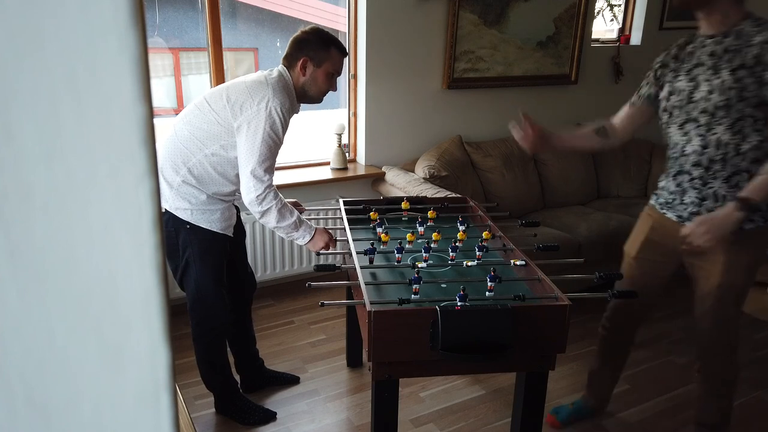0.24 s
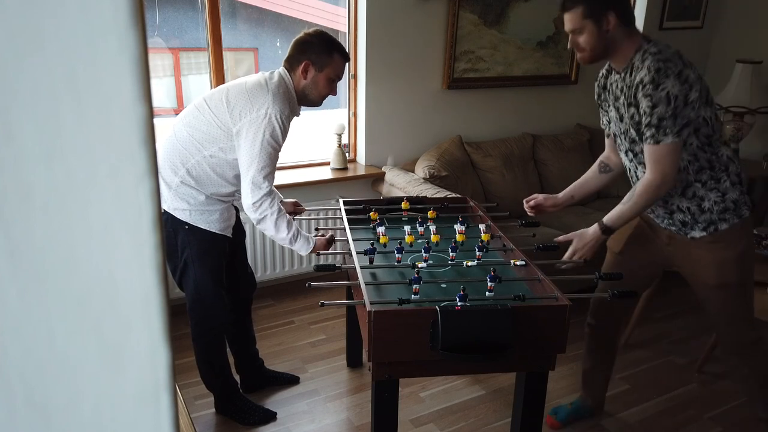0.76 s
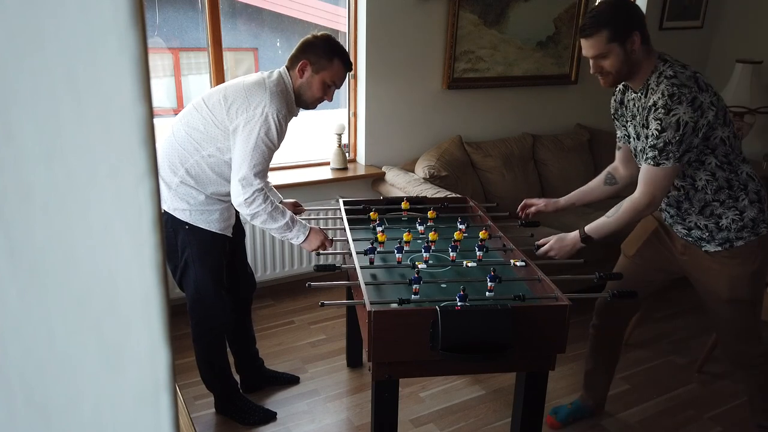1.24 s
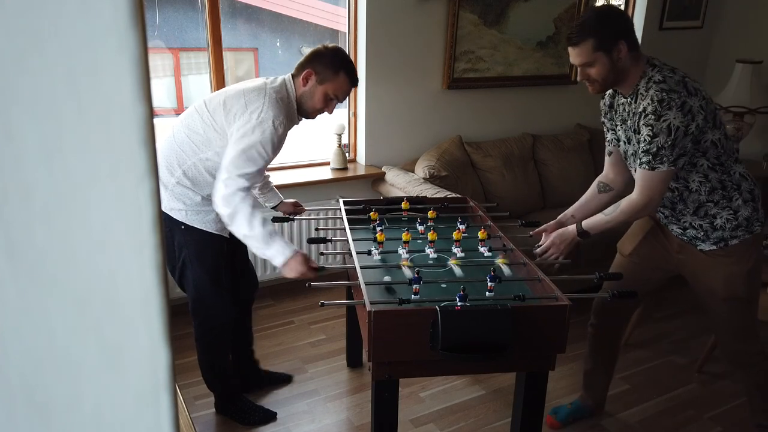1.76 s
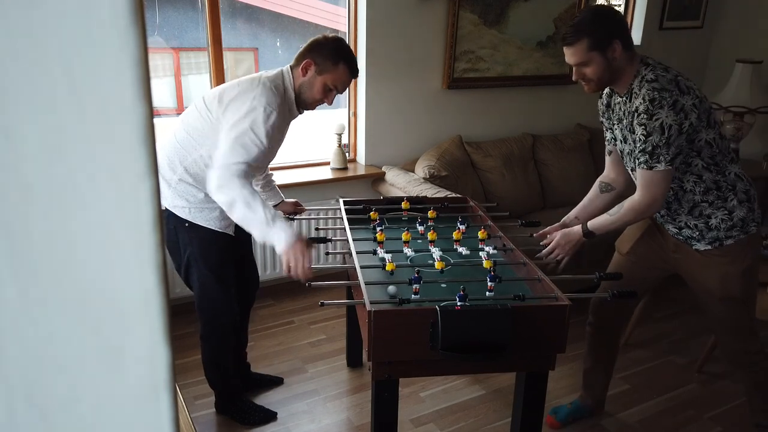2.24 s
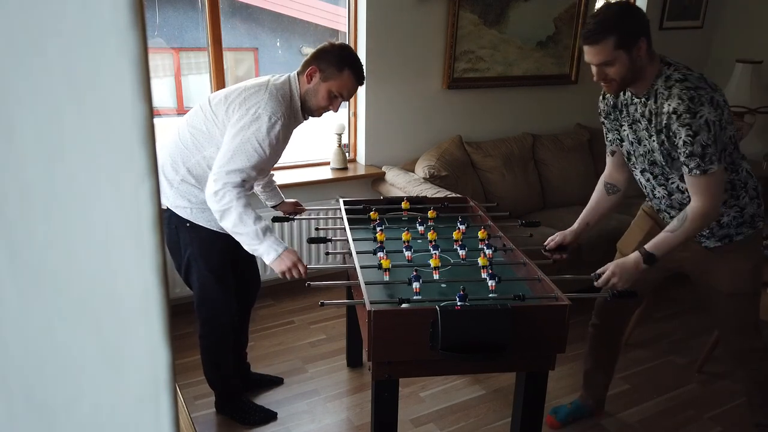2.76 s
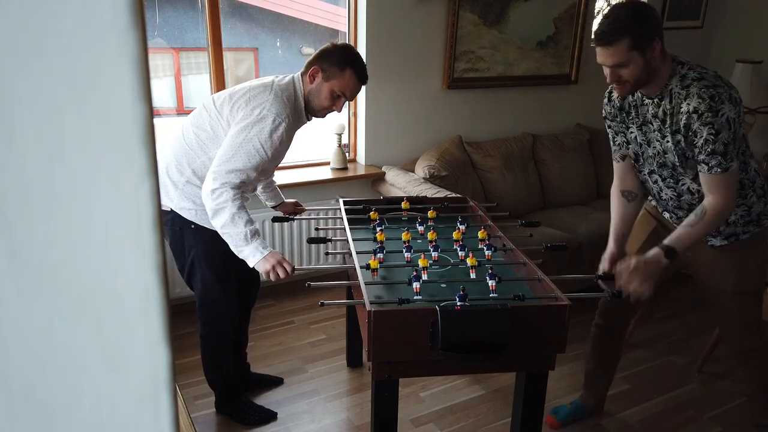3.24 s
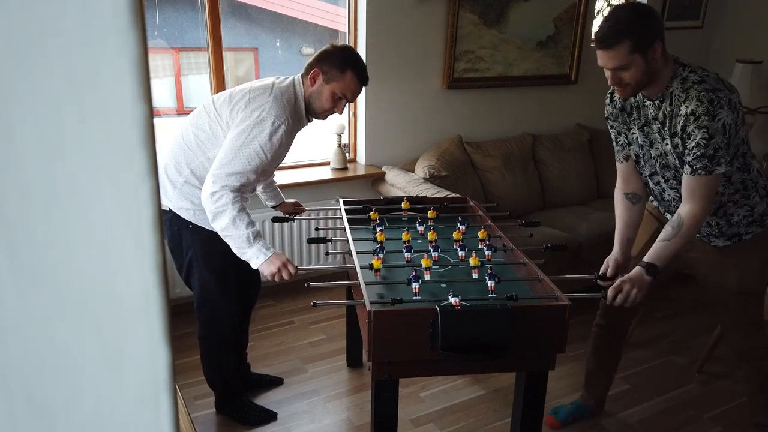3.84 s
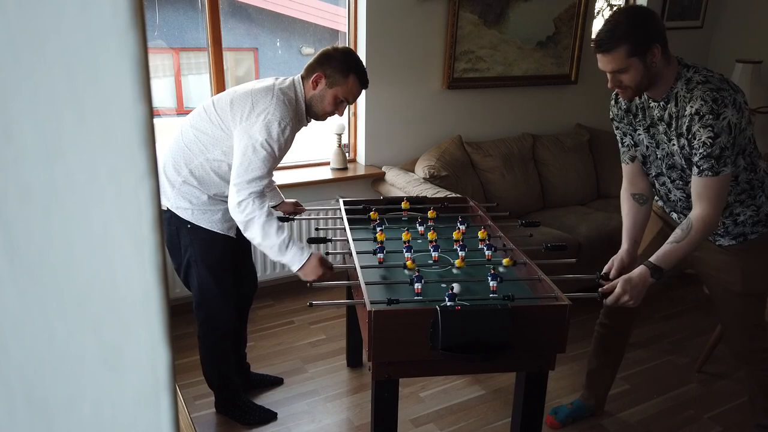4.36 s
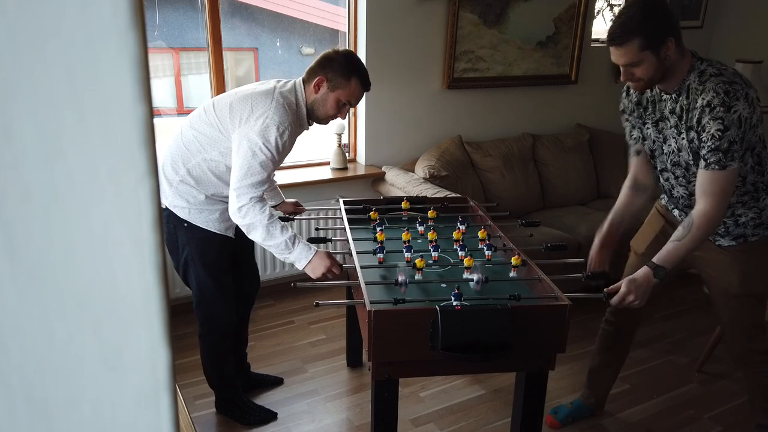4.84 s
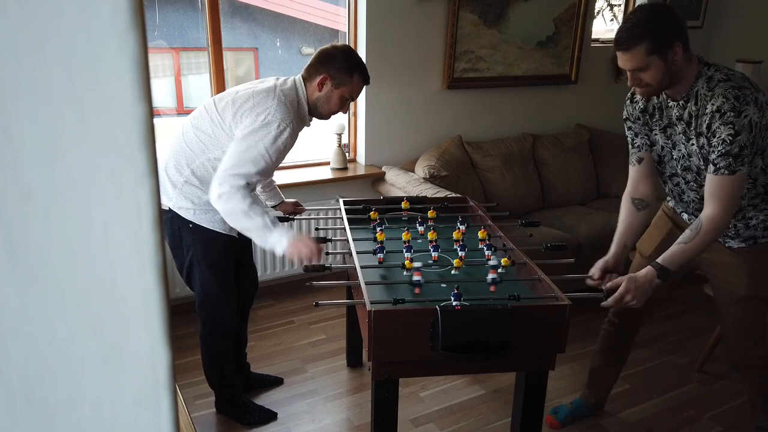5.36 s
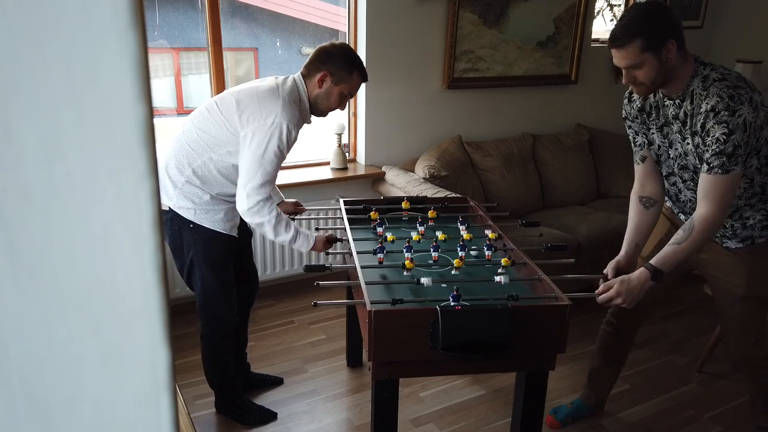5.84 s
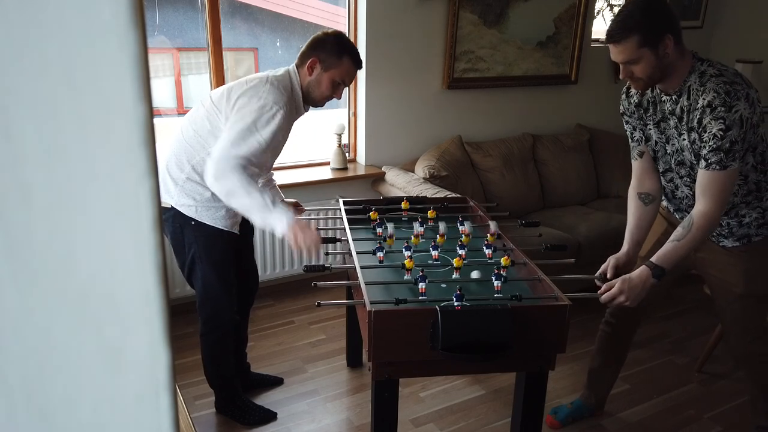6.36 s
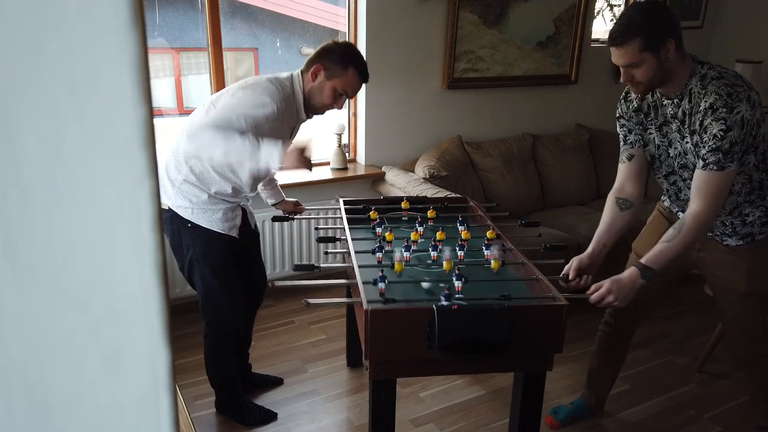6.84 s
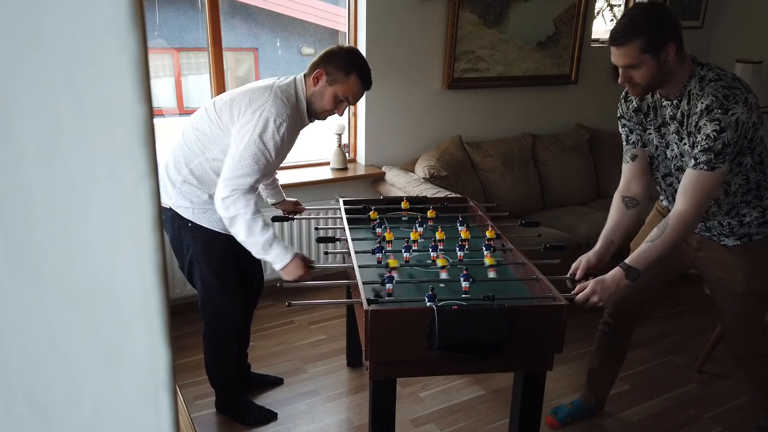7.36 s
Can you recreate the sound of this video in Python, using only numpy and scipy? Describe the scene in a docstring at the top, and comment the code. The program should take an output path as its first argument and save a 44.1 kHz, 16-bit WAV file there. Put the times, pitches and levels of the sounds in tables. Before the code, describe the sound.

Sharp ball and figure knocks on a hollow foosball table, loose steel rods rattling and ringing, with soft room echo and a final heavy flurry.

```python
"""Sharp knocks and clacks of table football in a living room, over hollow booms, rattle and low rumble.
Ball and figures are struck modes plus contact noise; the wooden cabinet booms on its panel modes.
Steel rods ring when they kick; loose in their bearings, they rattle as random clicks and hiss.
Floor boards rumble as decaying low noise; the room adds echoes and a short diffuse tail.
Two close microphone ports, a few metres away, hear it all over steady room tone."""
import sys
import numpy as np
from scipy import signal
from scipy.fft import rfft, irfft
from scipy.io import wavfile

SR = 44100
rng = np.random.default_rng(int(sys.argv[2]) if len(sys.argv) > 2 else 0)


def pcm_store(signal):
    """Save signal as 16-bit PCM."""
    levels = np.round(np.clip(np.atleast_2d(signal), -1, 1) * 32767)
    wavfile.write(sys.argv[1], SR, levels.astype(np.int16).T)


N = 335160  # samples
RING = np.arange(SR // 4) / SR  # time axis of one ring, s
STEP = 32  # samples between points of a coarse power curve

# Blows on the table, levels before the room. Each row: start in seconds, knock level in dB, clack level
# in dB, cabinet level in dB, struck panel pitch in Hz, tick level in dB, rod chink level in dB.
BLOW_EVENTS = [(0.376, -69.5, -67, -60, 170, -68, -78), (0.654, -68.5, -65, -54, 161, -62, -62),
               (0.949, -24.5, -13.5, -15, 463, -19.5, -26), (0.996, -18, -26, -13.5, 430, -39, -25.5),
               (1.038, -24, -25.5, -20, 406, -35, -30.5), (1.189, -42, -50, -30, 447, -67, -70),
               (1.246, -17, -11, -26, 427, -27, -30), (1.321, -36.5, -28.5, -23.5, 428, -34, -45),
               (1.572, -45.5, -43.5, -32.5, 260, -78, -80), (1.748, -56, -70, -39, 420, -83, -89),
               (1.814, -43, -68, -31, 456, -69, -80), (1.934, -60, -71, -37.5, 360, -72, -74),
               (2.048, -20, -23, -15, 418, -25.5, -25.5), (2.355, -78, -75, -46, 133.4, -75, -86),
               (2.4, -60, -72, -44.5, 484, -89, -65.5), (2.433, -47, -44, -32, 467, -64, -72.5),
               (2.483, -46, -48, -32.5, 453, -60.5, -71), (2.64, -77.5, -74, -45.5, 403, -84.5, -84),
               (2.757, -75.5, -73.5, -46.5, 454, -89.5, -85.5), (2.796, -62, -72, -41.5, 571, -82, -84),
               (2.833, -41, -49.5, -39.5, 241, -80, -81), (2.889, -55, -70, -55, 251, -81.5, -86),
               (2.931, -59, -68, -41.5, 432, -75, -82.5), (2.98, -67.5, -73.5, -54.5, 203, -81, -82),
               (3.497, -70.5, -66, -47, 140, -83.5, -88), (3.513, -59, -71.5, -43.5, 597, -87.5, -85.5),
               (3.543, -69.5, -69.5, -41, 232, -86.5, -86), (3.619, -67.5, -83.5, -67, 638, -85, -76),
               (4.088, -30, -30, -19, 456, -40, -45), (4.104, -41, -46, -35, 230.7, -58, -48),
               (4.219, -48.5, -32.5, -28.5, 444.5, -30.5, -30.5), (4.258, -49, -56, -52, 517, -47, -64),
               (4.392, -53.5, -74.5, -40.5, 153, -62, -78), (4.538, -61, -73.5, -38.5, 205, -69, -77),
               (4.666, -46.5, -66, -33, 205, -78, -79), (4.709, -42, -63, -44, 576.5, -59.5, -68),
               (4.728, -61, -64, -52, 210, -57.5, -66), (4.888, -40.5, -34, -27.5, 202, -44.5, -52),
               (4.959, -24.5, -45, -29.5, 455, -25.5, -34), (4.99, -29.5, -32, -28, 215, -25, -30),
               (5.1, -37.5, -60, -29, 130, -45, -52), (5.239, -16.5, -20, -25.5, 684, -40, -48.5),
               (5.516, -56, -72, -48.5, 206.5, -67.5, -74), (5.647, -64.5, -81, -47, 226, -84, -87.5),
               (5.668, -73.5, -78, -63.5, 560, -86.5, -86), (5.722, -49.5, -76, -40, 439, -80.5, -78),
               (5.798, -53.5, -74, -37, 477, -67.5, -76), (5.906, -43.5, -28, -26.5, 193, -37, -52),
               (6.025, -43, -63, -37, 231, -53, -61), (6.079, -28, -23.5, -32.5, 226, -29, -33),
               (6.16, -16, -10, -35, 405, -29, -38), (6.18, -14.5, -44, -16, 134, -31.5, -59),
               (6.2, -27.5, -23.5, -33, 442, -46, -55.5), (6.35, -30, -37, -24.5, 240, -47, -52.5),
               (6.495, -41, -64, -27.5, 239, -85, -84), (6.611, -43.5, -38, -32.5, 173, -46, -58),
               (6.774, -65, -71, -42, 422, -65, -77), (6.845, -38, -37.5, -27.5, 579, -49, -56),
               (6.903, -45, -50, -27.5, 452, -45, -39), (6.925, -30.5, -29.5, -32, 614, -36.5, -44),
               (6.969, -20.5, -18.5, -15, 436, -32.5, -33.5), (7, -22, -30, -18, 202, -31, -28.5),
               (7.063, -22.5, -24, -16.5, 400, -36, -26.5), (7.269, -42.5, -55, -30.5, 560, -59, -65),
               (7.514, -58, -71, -40.5, 208, -71, -77.5)]
# Modes of playing field and figures. Each row: frequency in Hz, relative level in dB, t60 in seconds.
FIELD_MODES = [(697, 1.5, 0.054), (914, 2, 0.048), (1072, -5.5, 0.071), (1196, 2, 0.051),
               (1200, -7.5, 0.0086), (1421, -0.5, 0.13), (1384, -1, 0.033), (1503, -7.5, 0.01),
               (1740, -1, 0.046), (1960, -1.5, 0.037), (2130, -2, 0.033), (2350, -4.5, 0.033),
               (2443, 1.5, 0.027), (2767, -3.5, 0.016), (3210, -9.5, 0.04), (3660, -20, 0.033)]
# Modes of the hollow wooden cabinet. Each row: frequency in Hz, relative level in dB, t60 in seconds.
CABINET_MODES = [(131, -3.5, 0.16), (164.4, -5, 0.11), (208.3, -2, 0.11), (242.8, -4, 0.089),
                 (282.5, -10.5, 0.077), (367, -3, 0.079), (418.6, 1, 0.068), (450, 1, 0.12),
                 (481, -6.5, 0.048), (569.3, -1.5, 0.068), (594.5, -4, 0.13), (673, -8, 0.058),
                 (841, -9, 0.067), (990, -14.5, 0.063), (1143, -13.5, 0.059), (1324, -25, .08),
                 (1443, -17.5, 0.02), (1700, -27.5, 0.045)]
PLACES = 3  # stretches of the table, each with its own path through the room


def blows():
    """Impact excitation: brief contact noise and the struck modes sound together at every blow."""
    out = np.zeros((PLACES, N + SR))
    field_spots = rng.standard_normal((len(BLOW_EVENTS), len(FIELD_MODES)))
    cabinet_spots = rng.standard_normal((len(BLOW_EVENTS), len(CABINET_MODES)))
    noise = rng.standard_normal((len(BLOW_EVENTS), len(RING)))
    low = np.transpose(FIELD_MODES)[0] < 1650  # Hz: low modes knock, high ones clack
    for k, (s, knock_db, clack_db, body_db, body_hz, tick_db, rod_db) in enumerate(BLOW_EVENTS):
        contact = noise[k] * fade(RING, 0.013)
        spot = np.sign(field_spots[k]) * undb(2.5 * field_spots[k])
        knock_noise = peak_one(band(band(contact, 700, 1550), 670, 2600))
        knock = ring(FIELD_MODES, spot * low) + knock_noise
        clack_noise = peak_one(band(band(contact, 1600, 2750), 1500, 2850))
        clack = ring(FIELD_MODES, spot * ~low) + .9 * clack_noise

        # loose parts start to rattle just after the contact
        loose = noise[k] * (1 - fade(RING, 0.12))
        tick = peak_one(band(loose * fade(RING, 0.036), 2600, 6000))
        chink = peak_one(band(loose * fade(RING, 0.054), 7000, 15000))

        boom = strike(CABINET_MODES, body_hz, cabinet_spots[k], scatter_db=1.5, slope_db=5.0)
        boom *= 1 - fade(RING, 0.0041)  # panels take a moment to swing

        blow = undb(knock_db) * knock + undb(clack_db) * clack
        blow += undb(tick_db) * tick + undb(rod_db) * chink + undb(body_db) * boom
        i = int(s * SR)
        out[k % PLACES, i:i + len(RING)] += blow
    return out[:, :N]


# A figure kicks the ball, levels before ROD_SHARE and the room.
# Each row: start in seconds, level in dB, pitch of the favoured rod modes in Hz.
KICK_EVENTS = [(0.9535, -18, 3130), (4.2188, -22.5, 10400), (4.9613, -19.5, 5500), (6.0796, -21, 3240),
               (6.904, -42, 3350), (7.065, -23.5, 10200)]
# Modes of a steel rod. Each row: frequency in Hz, relative level in dB, t60 in seconds.
ROD_MODES = [(3250, 0, .12), (3680, -8, .06), (4250, -3, .06), (5300, -6, .08), (5470, -3, .09),
             (6450, -7, .07), (7890, -9, .07), (8480, -6, .09), (10200, -6, .09), (10500, -5, .09),
             (12570, -14, .05)]


def kicks():
    """Modal ringing: a struck steel rod rings on its bending modes, strongest near one pitch."""
    out = np.zeros(N + SR)
    spots = rng.standard_normal((len(KICK_EVENTS), len(ROD_MODES)))
    for (s, db, hz), spot in zip(KICK_EVENTS, spots):
        tone = strike(ROD_MODES, hz, spot, scatter_db=1.5, slope_db=7.5)
        i = int(s * SR)
        out[i:i + len(RING)] += undb(db) * tone * (1 - fade(RING, 0.0028))
    return out[:N]


def clicks(rate, spread_db):
    """Poisson process: about `rate` clicks a second, of random sign and uneven level, at rms 1."""
    hits = rng.random(N) < rate / SR
    levels = undb(spread_db * rng.exponential(size=N))
    return unit(hits * rng.choice([-1, 1], N) * levels)


def rattle():
    """Random impact trains: loose rods click in their bearings into cabinet, figures and steel."""
    deep, panel, clatter, hiss = shaking()
    signs = (-1.) ** np.arange(len(CABINET_MODES))
    low = np.transpose(CABINET_MODES)[0] < 310  # Hz: deep boom below, panel boom above
    boom = 0
    for push, part in ((deep, low), (panel, ~low)):
        body = ring(CABINET_MODES, signs * part)
        body /= np.linalg.norm(body)
        boom = boom + signal.fftconvolve(clicks(350., 1.5) * push, body)[:N]
    knock = band(band(clicks(900., 1.4), 450, 2310), 660, 5000)
    scrape = band(clicks(6000., 0.99), 3400, 13000)
    return boom + clatter * unit(knock) + hiss * unit(scrape)


# Rods shoved or spun by hand, each a smooth swell, levels before ROD_SHARE and the room.
# Each row: middle in seconds, length in seconds, deep boom level in dB, panel boom level in dB,
# clatter level in dB, bearing hiss level in dB.
SHOVE_EVENTS = [(0.01, 0.088, -62, -61.5, -63, -71), (0.376, .1, -51, -74.5, -72, -83),
                (0.614, 0.98, -76, -86, -70.5, -73), (0.915, 0.09, -60, -75, -60, -66),
                (0.951, 0.046, -48, -40, -26.5, -37.5), (1.017, 0.1, -27, -24, -28.5, -38),
                (1.15, 0.14, -42, -36.5, -44, -67), (1.282, 0.15, -55, -36, -29, -36.5),
                (1.566, 0.23, -47.5, -45.5, -63, -93.5), (1.821, 0.29, -38.5, -46.5, -63, -78),
                (2.011, 0.39, -39, -42.5, -60.5, -61.5), (2.044, 0.059, -15.5, -15, -34, -32),
                (2.165, 0.22, -46, -54, -48, -63), (2.465, 0.17, -42.5, -38.5, -47.5, -64.5),
                (2.858, .14, -41, -41.5, -57.5, -84), (2.945, 0.091, -42, -47, -63.5, -85),
                (3.2, 0.37, -66, -63.5, -80, -77), (3.535, 0.2, -47.5, -50, -72, -90),
                (4.059, 0.22, -58, -62, -68.5, -68.5), (4.099, 0.064, -26, -36, -38, -54),
                (4.184, 0.23, -45, -38.5, -46.5, -47), (4.402, .3, -49, -62, -83, -92),
                (4.62, 0.41, -49, -48.5, -74.5, -75), (4.729, 0.082, -35, -62, -56, -87),
                (4.888, 0.061, -28, -38, -47, -58), (4.968, 0.059, -23.5, -37, -33, -31),
                (5.066, 0.38, -31.5, -28, -38, -60), (5.231, 0.055, -38, -45.5, -43, -61),
                (5.374, 0.29, -37, -41, -63, -70.5), (5.627, 0.049, -38, -41, -77.5, -90),
                (5.774, 0.17, -37, -53, -82, -73), (5.922, .1, -29, -38, -50, -60),
                (6.136, 0.23, -25.5, -25, -32.5, -47), (6.194, 0.11, -34, -25.5, -33, -42),
                (6.351, 0.56, -28, -31.5, -51, -68), (6.651, 0.18, -30, -33, -48, -66),
                (6.81, 0.23, -37.5, -39.5, -67, -73), (6.887, 0.17, -26.5, -29.5, -43, -55.5),
                (6.994, 0.11, -22.5, -20, -24, -39.5), (7.097, 0.26, -23.5, -22, -29, -41.5),
                (7.231, 0.23, -39, -40, -47, -68), (7.515, 0.22, -47, -52, -82, -81)]
# per layer (deep boom, panel boom, clatter, hiss): dB against the blow, t60 in s, dB at rest
SHAKE_DB, SHAKE_T60_S, REST_DB = [-6.5, -9.5, -3.5, -6.5], [.25, 0.2, 0.27, 0.22], [-74, -80, -81, -84.5]
SHAKE_RISE_S = 0.01
DEEP_DB_PER_OCTAVE, DEEP_PIVOT_HZ = -3.5, 300  # blows on low panels shake out more of the deep boom


def shaking():
    """Power summation: each rattle layer adds the power left by blows, shoves and the state of rest."""
    s, _, clack_db, body_db, body_hz, tick_db, rod_db = np.transpose(BLOW_EVENTS)
    middle, length, *shove_dbs = np.transpose(SHOVE_EVENTS)[:, :, None]
    phase = np.clip((np.arange(0, N, STEP) / SR - middle) / length, -.5, .5)
    swell = np.cos(np.pi * phase) ** 2
    deep_db = body_db + DEEP_DB_PER_OCTAVE * np.log2(body_hz / DEEP_PIVOT_HZ)
    drive = [deep_db, body_db, (clack_db + tick_db) / 2, rod_db]
    gains = []
    for blow, shove, db, t60, rest in zip(drive, shove_dbs, SHAKE_DB, SHAKE_T60_S, REST_DB):
        from_blows = after(s, blow + db, t60, SHAKE_RISE_S)
        from_shoves = np.sum((undb(shove) * swell) ** 2, axis=0)
        gains.append(gain_from(from_blows + from_shoves + undb(rest) ** 2))
    return gains


# Feet and table legs thump the floor boards.
# Each row: start in seconds, level in dB before the swell-in, t60 in seconds.
THUMP_EVENTS = [(0.0, -52.5, 0.22), (0.15, -59, 0.35), (0.34, -53, .6), (0.94, -42, 0.98),
                (1.25, -56.5, 1.7), (1.77, -57.5, 0.63), (2.05, -45.5, 1.6), (2.2, -49, 0.44),
                (2.48, -54, .6), (2.63, -55, 1.14), (3.72, -68.5, .6), (4.15, -56, 1.6), (4.88, -40, 0.7),
                (5.1, -47.5, 1.9), (5.41, -61, 0.57), (5.87, -49, .8), (5.98, -36, 0.22), (6.15, -24, 0.45),
                (6.32, -47, 0.7), (6.64, -51.5, 0.56), (6.9, -42, .5), (6.98, -15.5, .18),
                (7.08, -21.5, 0.11), (7.15, -39.5, 0.96)]
THUMP_RISE_S, FLOOR_REST_DB = .04, -71


def boards():
    """Damped low-frequency vibration: floor boards rumble as low noise that fades after each thump."""
    power = after(*np.transpose(THUMP_EVENTS), THUMP_RISE_S) + undb(FLOOR_REST_DB) ** 2
    return gain_from(power) * unit(band(rng.standard_normal(N), 20, 62))


# Spectrum of room tone and hiss. Each row: frequency in Hz, relative level in dB.
TONE_SPECTRUM = [(15, -25.5), (25, 2), (96, -9.5), (174, 1), (351, -15), (447, -10.5), (670, -22.5),
                 (1280, -19.5), (6280, -32), (9410, -36.5), (12300, -33), (13400, -53), (15700, -43)]
TONE_DB = -68  # rms, before the ports and capsules


def room_tone():
    """Stationary coloured noise: the steady hum and hiss of the quiet room."""
    return unit(shape(rng.standard_normal(N), TONE_SPECTRUM)) * undb(TONE_DB)


# Reverberation of the room. Each row: frequency in Hz, t60 in seconds, tail level in dB.
REVERBERATION = [(99, 0.54, -35.5), (390, 0.38, -26), (1080, 0.39, -27), (3030, 0.43, -28.5),
                 (8000, 0.42, -23.5), (15000, 0.18, -33)]
# First floor and wall echoes. Each row: delay in seconds, level in dB against the direct sound.
FIRST_ECHOES = [(.004, 0.5), (.012, -3), (.022, -8.5), (.028, -9.5), (.036, -11)]


def room(dry):
    """Impulse response: direct sound, first echoes and a diffuse tail, unrelated in mid and side."""
    t = np.arange(SR) / SR
    hz, t60, db = np.transpose(REVERBERATION)
    tails = np.zeros((2, len(t)))
    for f in 45 * 2. ** np.arange(9):  # octave bands, Hz
        band_t60 = np.interp(np.log(f), np.log(hz), t60)
        band_db = np.interp(np.log(f), np.log(hz), db)
        noise = band(rng.standard_normal(tails.shape), f / np.sqrt(2), f * np.sqrt(2))
        tails += fade(t, band_t60) * undb(band_db) * noise
    tails *= 1 - fade(t, 0.014)  # the tail builds up as echoes thicken
    for s, db in [(0.00018, 0)] + FIRST_ECHOES:  # the direct sound comes first
        i = int(s * SR)
        tails[0, i + 2] += undb(db)
        # one port hears each front a little before the other
        tails[1, [i, i + 4]] += .6 * undb(db) * rng.choice([-1, 1]) * np.array([1, -1])
    return undb(-2.5) * signal.fftconvolve(dry[None], tails, axes=1)[:, :N]


def undb(db):
    """Logarithmic level: decibels to amplitude gain."""
    return 10 ** (np.asarray(db) / 20)


def unit(x):
    """Effective value: scale to rms 1."""
    return x / np.sqrt(np.mean(x ** 2))


def peak_one(x):
    """Peak value: scale the largest excursion to 1."""
    return x / np.abs(x).max()


def band(x, lo_hz, hi_hz):
    """Band limitation: causal Butterworth band-pass."""
    sos = signal.butter(2, [lo_hz, min(hi_hz, 20000)], "band", fs=SR, output="sos")
    return signal.sosfilt(sos, x)


def shape(x, table):
    """Spectral weighting: colour by (Hz, dB) points joined on a logarithmic frequency axis."""
    hz, db = np.transpose(table)
    log_f = np.log(np.fft.rfftfreq(len(x), 1 / SR) + 1)
    return irfft(rfft(x) * undb(np.interp(log_f, np.log(hz), db)), len(x))


def fade(t, t60):
    """Exponential damping: decay by 60 dB in t60 seconds."""
    return np.exp(-np.log(1000) * t / t60)


def ring(modes, spot):
    """Modal superposition: damped sines, peak 1; the struck spot sets how much each mode gets."""
    hz, db, t60 = np.transpose(modes)[:, :, None]
    partials = undb(db) * fade(RING, t60) * np.sin(2 * np.pi * hz * RING)
    return peak_one(np.sum(spot[:, None] * partials, axis=0))


def strike(modes, near_hz, chance, scatter_db, slope_db):
    """Selective excitation: modes near one pitch are favoured, each scattered by its own chance."""
    octaves = np.abs(np.log2(np.transpose(modes)[0] / near_hz))
    return ring(modes, np.sign(chance) * undb(scatter_db * chance - slope_db * octaves))


def after(times, dbs, t60s, rise):
    """Energy decay: summed power over time of events that swell in and die away."""
    late = np.maximum(np.arange(0, N, STEP) / SR - np.asarray(times)[:, None], 0)
    envelope = (1 - fade(late, rise)) * fade(late, np.reshape(t60s, (-1, 1)))
    return np.sum((undb(dbs)[:, None] * envelope) ** 2, axis=0)


def gain_from(power):
    """Amplitude is the root of power: gain at every sample from a coarse power curve."""
    return np.interp(np.arange(N), np.arange(0, N, STEP), np.sqrt(power))


# Side against mid at the two ports. Each row: frequency in Hz, gain of the side in dB.
PORT_SIDE = [(60, -24.5), (110, -38.5), (200, -62), (380, -63.5), (700, -15.5), (1290, -15), (2380, -7.5),
             (4400, -3), (8120, -1), (15000, 4.5)]
ROD_SHARE = 0.39  # share of the rods' own noise that leaves the table


def scene():
    """Mid-side superposition: table in the room, rumble and tone at ports that differ mainly in treble."""
    mid, side = room(ROD_SHARE * (rattle() + kicks())) + sum(room(place) for place in blows())
    rumble = boards()
    mid = mid + room_tone() + rumble
    side = shape(side + room_tone() + .3 * rumble, PORT_SIDE)
    return np.array([mid + side, mid - side])


# Colour of the microphone capsules. Each row: frequency in Hz, gain in dB.
CAPSULE = [(3000, -0.5), (6500, -3), (8500, 0.5), (9900, 4.5), (11500, -5), (15500, -12.5)]
TOP_HZ = 15800


def record(dry):
    """Frequency response: the capsules peak near 10 kHz and fall above; a steep low-pass cuts the top."""
    coloured = np.array([shape(channel, CAPSULE) for channel in dry])
    return signal.sosfilt(signal.ellip(10, .2, 80, TOP_HZ, fs=SR, output="sos"), coloured)


dry = scene()
out = record(dry)
pcm_store(out)
```